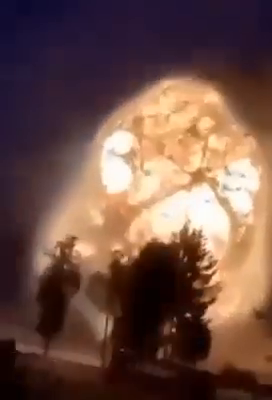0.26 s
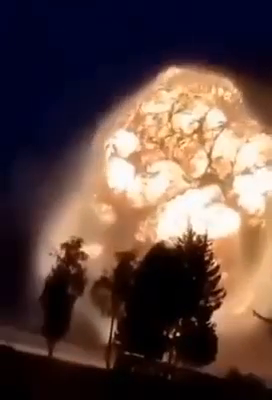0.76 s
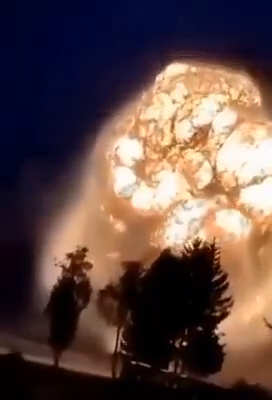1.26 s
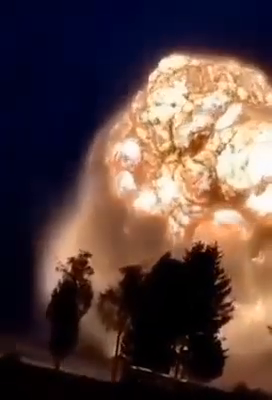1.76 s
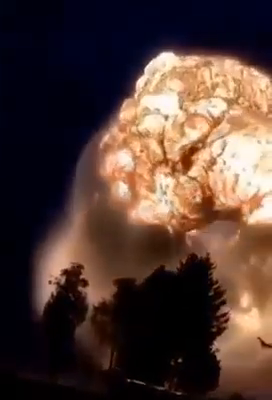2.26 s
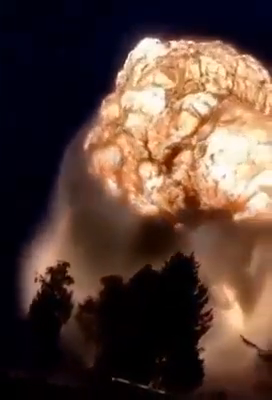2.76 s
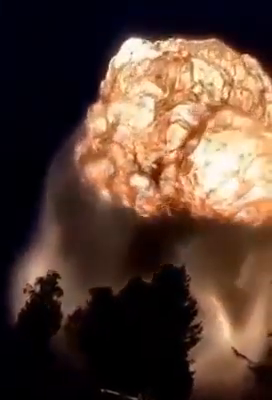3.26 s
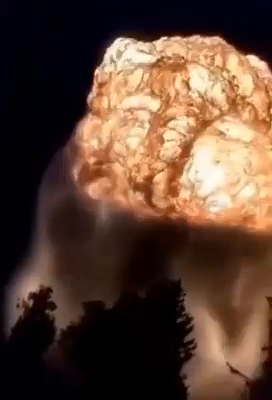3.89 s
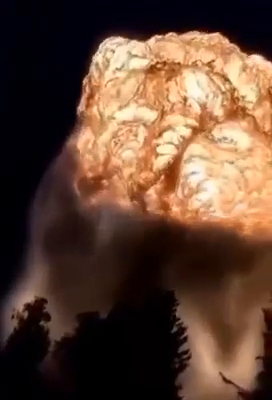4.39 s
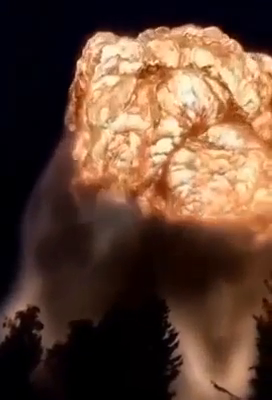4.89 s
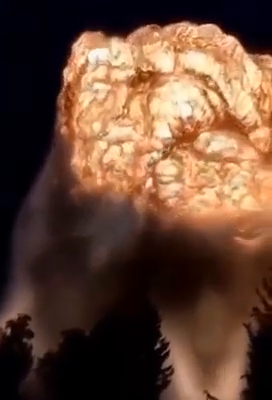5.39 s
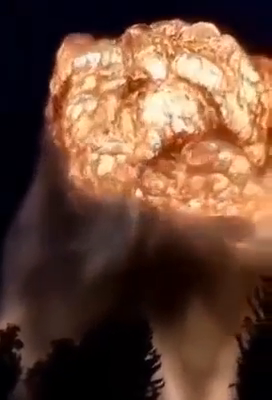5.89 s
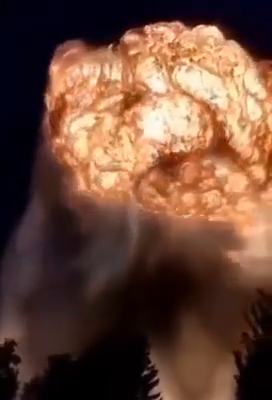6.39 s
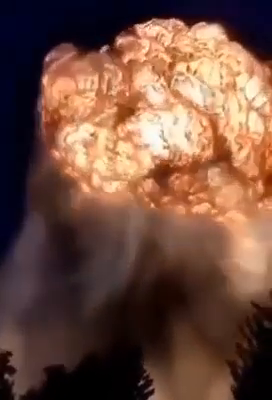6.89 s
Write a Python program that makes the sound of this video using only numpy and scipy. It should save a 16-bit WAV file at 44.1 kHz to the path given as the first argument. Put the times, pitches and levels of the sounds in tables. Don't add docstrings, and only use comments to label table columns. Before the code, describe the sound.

Continuous explosion roar across open fields, no quiet start and no ending. Countless overlapping shocks merge into rough thunder, with snapping blasts and heavy thumps early on, and a tiny dropout with a pop just after one second. Echoes grow darker and more distant, with a brief brighter surge around five seconds, then mostly bass booms. The phone microphone squashes the level, softens peaks and makes the treble patchy and watery.

```python
import sys
import numpy as np
from scipy import signal
from scipy.fft import rfft, irfft, next_fast_len
from scipy.io import wavfile
from scipy.ndimage import uniform_filter1d

SR = 44100
rng = np.random.default_rng(int(sys.argv[2]) if len(sys.argv) > 2 else 0)


def boost(x):
    u = np.asarray(x, float) / 20
    return 10 ** u


def put_to_file(sound):
    columns = np.atleast_2d(sound).T
    safe = np.clip(columns, -1, 1)
    whole_steps = np.round(safe * 32767)
    wavfile.write(sys.argv[1], SR, whole_steps.astype(np.int16))


N = 315050

LAYER_HZ = [
    65,
    160,
    650,
    2500,
    4100,
]
# pitch_hz, level_db (per Hz)
FIREBALL_COLOUR = [(12, -49), (20, -20), (33, -17.5), (86, 1), (159, -0.5), (205, -2.5), (398, -13),
                   (1230, -23), (1850, -31.5), (2500, -36.5), (3100, -41), (3600, -43), (4300, -44.5),
                   (5270, -50), (6150, -55.5), (7170, -66.5), (8140, -66.5), (9020, -74), (11700, -105),
                   (19800, -120)]
# start_s, treble_loss_db (negative is loss), deep_shock_level_db
ECHO_DISTANCE = [(0, 0, 0), (0.199, 2, 1), (.5, -3.5, 0.5), (0.899, -6.5, -2.5), (1.301, -10.5, -2),
                 (1.8, -11, -4), (2.2, -16.5, -4), (2.7, -19, -5), (3.3, -21.5, -11), (3.9, -25, -11),
                 (4.453, -32, -8), (4.7, -31.5, 0), (5.05, -22.5, -2.5), (5.451, -29, -5),
                 (5.901, -38, 0.5), (6.3, -41.5, -0.5), (6.701, -45, -2.5), (7.14, -46, 1.5)]
# centre_s, rise_db, length_s
BOOMS = [(.16, 2.5, 0.18), (.29, 6.5, 0.056), (.47, -1.5, 0.036), (.7, 5.5, 0.14), (1.05, 7, 0.15),
         (1.27, 9.5, 0.087), (1.54, 4.5, 0.062), (1.94, 9.5, 0.05), (2.15, 6, 0.11), (2.27, 14, 0.06),
         (2.39, 5, 0.076), (2.65, 10.5, 0.082), (2.87, 1.5, 0.054), (3.03, 7, .1), (3.23, 6, 0.047),
         (3.7, 5, 0.1), (3.83, 4.5, 0.079), (4.2, 9.5, 0.078), (4.46, 9, .1), (4.68, 2.5, 0.057),
         (4.89, 5, 0.083), (5.03, 5.5, 0.058), (5.23, 7.5, 0.16), (5.52, 3, 0.039), (5.88, 5.5, 0.2),
         (6.0, 15.5, 0.041), (6.3, 2.5, 0.11), (6.95, 3, 0.11)]
# centre_s, rise_db, length_s
RUMBLE_HEAVES = [(.02, -3, .05), (.08, -0.5, 0.071), (.3, 3.5, .1), (.54, 6.5, 0.038), (.68, -2, 0.065),
                 (.77, 4.5, .08), (.91, -4.5, 0.098), (1.08, -2.5, 0.068), (1.13, 3.5, 0.036),
                 (1.23, -4.5, 0.088), (1.43, 0.5, 0.083), (1.56, -3.5, 0.062), (1.75, 0.5, 0.14),
                 (1.9, 0.5, 0.055), (2.1, 1.5, .1), (2.3, 3, 0.09), (2.58, -1, .07), (2.64, -5, 0.039),
                 (2.75, -1, 0.087), (2.95, 1, 0.13), (3.2, -4, .1), (3.45, -3, 0.078), (3.65, -2, .1),
                 (3.9, 0.5, .1), (4.1, -1, 0.13), (4.28, 1, .07), (4.5, -0.5, 0.087), (4.72, 2, 0.15),
                 (4.95, -1, 0.12), (5.15, 3.5, 0.062), (5.25, 3, .07), (5.33, 3, 0.043),
                 (5.43, -5.5, 0.034), (5.6, -1.5, 0.14), (5.8, 6, .1), (6.0, 5, .1), (6.2, 2, 0.11),
                 (6.4, -1, .1), (6.6, -3, .1), (6.8, 0, .1), (6.95, 3.5, .1), (7.11, -0.5, 0.055)]
# centre_s, rise_db, length_s, brightness (0-1)
ROAR_SURGES = [(0.173, 4, 0.048, 0.4), (0.337, 6, 0.032, 0.7), (0.474, 3, 0.026, 0.6),
               (0.814, 2.5, 0.053, 0.1), (1.044, 4.5, 0.063, 0.1), (1.134, 4.5, 0.067, 0.8),
               (1.355, 9, 0.035, .4), (1.526, 3.5, 0.018, 0.3), (1.786, 1.5, 0.24, 0.5),
               (1.989, 3.5, 0.062, 0.3), (2.317, 2.5, 0.034, 0.4), (2.455, 5.5, 0.036, 0.2),
               (2.657, 4.5, 0.15, 0.4), (2.869, -1, 0.033, .6), (3.04, 5.5, 0.055, 0.5),
               (3.5, 1.5, 0.082, 0.8), (3.697, 2, 0.059, .4), (4.316, 4, 0.086, 0.5),
               (4.69, 0.5, 0.03, 0.4), (4.811, 9, 0.074, 0.8), (4.925, 5, 0.1, 0.9), (5.051, 4, 0.051, 0.9),
               (5.171, 2, 0.062, 0.6), (5.334, -1, 0.12, 0.6), (5.427, 2.5, 0.11, 0.7),
               (5.622, 4, 0.14, .4), (6.051, 1, .06, 0.3), (6.317, 0, 0.067, 0.8), (6.508, 3.5, 0.63, 0.6),
               (7.036, 6, 0.089, .6), (7.11, 4, 0.063, 0.03)]
# start_s, peak_db, body_db (over the crack)
CRACKING_BLASTS = [(0.148, -20.5, 0), (0.3416, -19, 9), (0.4944, -20, 16), (0.7345, -33, 7),
                   (0.9235, -32.5, 0), (0.93, -37, 5.5), (1.1672, -33.5, 0.5), (1.2455, -27.5, -4),
                   (1.2875, -34.5, 6.5), (1.29, -36, -1), (1.603, -32.5, 6), (1.702, -32, 2),
                   (1.9049, -28, -7), (1.9782, -30, 1), (2.1121, -30, -3.5), (2.4102, -37.5, -1),
                   (2.4985, -46, -3), (2.6601, -36, 6.5), (2.705, -42, 2), (2.9659, -29.5, -1),
                   (3.144, -39, 9), (3.2095, -34.5, -12), (3.4509, -29.5, -9), (3.4765, -37, -4.5),
                   (3.5575, -40, -1.5), (4.0613, -52.5, 4), (4.099, -39.5, -2.5), (4.242, -37.5, -4.5),
                   (4.2975, -51, 0), (4.538, -49, 1), (4.7054, -32.5, 2.5), (4.7116, -39, 3.5),
                   (4.819, -32.5, -5), (4.8417, -39, 3), (4.904, -47, 12.5), (4.9274, -48.5, 12),
                   (4.945, -26.5, 11.5), (4.9588, -46, 9.5), (5.289, -55, 4), (5.532, -57.5, 2),
                   (5.581, -54, 1.5), (5.9314, -46, -4), (6.1996, -48, -5), (6.29, -59, 4.5),
                   (6.4855, -55, 9.5), (6.5062, -47.5, -5), (6.691, -62, 0), (6.97, -59, -3),
                   (0.0987, -22, 0.5), (0.2523, -24.5, 1), (0.4663, -28, 2.5), (0.5901, -32, -2),
                   (0.6325, -33.5, 0.5), (0.06, -25.5, -0.5), (5.77, -57, 0), (6.37, -56, 0),
                   (6.57, -54, -2)]
# start_s, peak_db, tail_t60_s
DULL_BLASTS = [(0.349, -17, 0.11), (0.498, -10.5, 0.24), (0.919, -6, 0.14), (1.035, -15, 0.27),
               (1.33, -18, 0.063), (1.501, -20.5, 0.18), (1.599, -27, 0.087), (1.624, -20, 0.15),
               (2.299, -26.5, 0.17), (2.648, -18, 0.13), (4.365, -20, 0.1), (4.793, -15.5, 0.17),
               (4.924, -5, 0.13), (6.782, -22, 0.064)]
# pitch_hz, width_hz, start_s, end_s, threshold_shift_db
HOLE_LANES = [
    (1650, 500, 1.3, 3.9, 1.2),
    (1900, 1600, 4.0, 7.2, -3),
    (3250, 400, 0, .5, 1.8),
    (3650, 400, .5, 5.2, 1.6),
    (2900, 900, 0, 5.2, .9),
    (3500, 450, 5.25, 7.2, 6),
    (5000, 2400, 0, 5.7, 1.4),
    (6700, 700, 0, 2.7, 2),
]
# start_s, length_s, depth_db
DROPOUTS = [
    (1.2665, .0185, -11),
    (.234, .003, -6),
    (.912, .005, -6),
]


def unit(x):
    return x / np.sqrt(np.mean(x ** 2))


def walk(rate_hz):
    hold = int(SR / rate_hz)
    held = np.repeat(rng.standard_normal(N // hold + 1), hold)
    return unit(uniform_filter1d(uniform_filter1d(held, hold), hold)[:N])


def swells(table):
    t = np.arange(0, N, 64) / SR
    db = sum(rise_db * np.exp(-(2 * (t - s) / length_s) ** 2) for s, rise_db, length_s in table)
    return np.interp(np.arange(N) / SR, t, db)


def above(db, floor_db):
    return 10 * np.log10(boost(2 * db) + boost(2 * floor_db))


def steady(x, seconds, share):
    running = uniform_filter1d(x ** 2, int(seconds * SR)) + 1e-9
    return x * (np.mean(x ** 2) / running) ** (share / 2)


def ring(x, hz, width_hz):
    return signal.lfilter(*signal.iirpeak(hz, hz / width_hz, fs=SR), x)


def dull(x, hz):
    return signal.sosfilt(signal.butter(6, hz, fs=SR, output="sos"), x)


def fireball():
    layer_db = layers()
    layer_db -= 10 * np.log10(np.mean(boost(2 * layer_db), axis=1, keepdims=True))
    rumble_db = 10 * np.log10(np.clip(1.6 - 0.68 * boost(2 * layer_db[0]), .15, None))
    layer_db = np.insert(layer_db, 1, rumble_db + swells(RUMBLE_HEAVES), axis=0)

    hz, colour_db = np.transpose(FIREBALL_COLOUR)
    size = next_fast_len(N)
    octave = np.log2(np.arange(size // 2 + 1) * SR / size + 1)
    spectrum = rfft(shocks(per_s=900, spread_db=4.0, share=0.68), size)
    spectrum = spectrum * boost(np.interp(octave, np.log2(hz), colour_db))

    churn = walk(9)
    out = 0
    for centre in np.arange(4.5, 13.6, .5):
        band = irfft(spectrum * np.clip(1 - 2 * abs(octave - centre), 0, 1), size)[:N]
        place = np.interp(centre, np.log2(LAYER_HZ), range(5))
        db = sum(max(1 - abs(place - k), 0) * layer_db[k] for k in range(5))
        db = db + 1.6 * max(centre - 12.4, 0) * layer_db[4]
        db = db + min(place, 2) * (.25 * churn + .6 * walk(17))
        if place > 3:
            db = db + (place - 3) * 1.5 * walk(22)
        out = out + boost(db) * steady(band, seconds=0.14, share=0.6)
    return unit(out) * boost(-17)


def shocks(per_s, spread_db, share):
    size_db = spread_db * np.minimum(rng.exponential(size=N), 3)
    jumps = (rng.random(N) < per_s / SR) * boost(size_db)
    blur_s = 5
    share = share * np.exp(-np.arange(N) / SR / blur_s)
    return np.sqrt(share) * unit(jumps - jumps.mean()) + np.sqrt(1 - share) * rng.standard_normal(N)


def layers():
    s, loss_db, deep_db = np.transpose(ECHO_DISTANCE)
    t = np.arange(N) / SR
    loss_db = np.interp(t, s, loss_db)
    dark_db = swells([(at, 2 * (1 - bright) * db, length) for at, db, length, bright in ROAR_SURGES])
    bright_db = swells([(at, 2 * bright * db, length) for at, db, length, bright in ROAR_SURGES])
    thud = np.interp(t, s, deep_db) + swells(BOOMS) + 2.5 * walk(14)
    roar = above(0.32 * loss_db, floor_db=-3.5) + dark_db
    rush = above(0.67 * loss_db, floor_db=-20) + .9 * bright_db
    hiss = loss_db + 0.67 * bright_db
    return np.array([thud, roar, rush, hiss])


def blasts():
    crack, body = np.zeros((2, N + SR))
    t = np.arange(SR // 2) / SR
    t60_s, echo_db = 0.043, -17.5
    for s, peak_db, body_db in CRACKING_BLASTS:
        echoes = rng.standard_normal(len(t)) * boost(-60 * t / t60_s + echo_db)
        echoes[:7] += np.linspace(1, -1, 7)
        at = slice(int(s * SR), int(s * SR) + len(t))
        crack[at] += boost(peak_db) * echoes
        body[at] += boost(peak_db + body_db) * echoes
    broad = signal.sosfilt(signal.butter(2, [1900, 4600], "band", fs=SR, output="sos"), crack)
    air = dull(ring(ring(crack, 7900, 1500), 7900, 1500), 8900)
    sharp = dull(dull(broad, 6300), 6300) + boost(-20) * air
    low_body = dull(ring(body, hz=1200, width_hz=1300), 2500)
    return (boost(10.5) * sharp + boost(1) * low_body)[:N]


def thumps():
    burst = np.zeros(N + SR)
    t = np.arange(SR // 2) / SR
    for s, peak_db, t60_s in DULL_BLASTS:
        echoes = rng.standard_normal(len(t)) * boost(peak_db - 60 * t / t60_s)
        burst[int(s * SR):][:len(t)] += echoes
    return boost(-1.5) * dull(ring(burst, hz=720, width_hz=1100), 1700)[:N]


def ridge():
    s, _, deep_db = np.transpose(ECHO_DISTANCE)
    octaves = -0.0767 * np.interp(np.arange(N) / SR, s, deep_db) + .16 * walk(3)
    hz = 88.54 * 2 ** octaves
    width_hz = 22
    sway = walk(width_hz) + 1j * walk(width_hz)
    return unit(np.real(sway * np.exp(2j * np.pi * np.cumsum(hz) / SR))) * boost(-27.5)


def scene():
    return (fireball() + blasts() + thumps() + ridge())[None]


def gate(x):
    threshold_db, depth_db, from_hz, crack_fills_db = -3.6, -28, 1400, 2
    hz, t, cells = signal.stft(x, SR, nperseg=1024, noverlap=768)
    power = abs(cells) ** 2

    def mean_power(bins, frames):
        return uniform_filter1d(uniform_filter1d(power, bins, axis=0), frames, axis=1) + 1e-18

    lanes_db = 0
    for at_hz, width_hz, start_s, end_s, shift_db in HOLE_LANES:
        lane = np.exp(-(2 * (hz - at_hz) / width_hz) ** 2)
        lanes_db = lanes_db + shift_db * np.outer(lane, (t >= start_s) & (t < end_s))
    patch_db = 10 * np.log10(mean_power(4, 7) / mean_power(25, 7))
    over_db = patch_db - threshold_db - lanes_db
    shut = np.clip(.5 - 2 * over_db, 0, 1) * (hz[:, None] > from_hz)
    treble_db = 10 * np.log10(np.sum(power[(hz > 2500) & (hz < 6500)], axis=0) + 1e-18)
    jump_db = treble_db - uniform_filter1d(treble_db, 30)
    shut = shut * np.clip(1 - (jump_db - crack_fills_db) / 2, 0, 1)
    return signal.istft(cells * boost(depth_db * shut), SR, nperseg=1024, noverlap=768)[1][:N]


def falter(x):
    t = np.arange(N) / SR
    db = sum(depth_db * np.exp(-(2 * (t - s) / length_s - 1) ** 6) for s, length_s, depth_db in DROPOUTS)
    pop_s, decay_s = 1.2733, 0.00034
    pop = np.exp(-np.clip(t - pop_s, 0, 1) / decay_s) * (t >= pop_s)
    pop = signal.sosfilt(signal.butter(3, 2800, fs=SR, output="sos"), pop)
    return x * boost(db) + boost(-11) * pop


def top_cut(x):
    return signal.sosfilt(signal.butter(12, 9090, fs=SR, output="sos"), x)


def record(dry):
    held = steady(dry[0], seconds=0.04, share=0.2) * boost(1.35)
    rounded = np.tanh(2.39 * held) / 2.58
    to_end_s = (N - np.arange(N)) / SR
    rounded = rounded * (1 - np.exp(-(to_end_s / .0012) ** 2))
    mix = falter(gate(rounded))[None]
    return top_cut(mix)


dry = scene()
out = record(dry)
put_to_file(out)
```